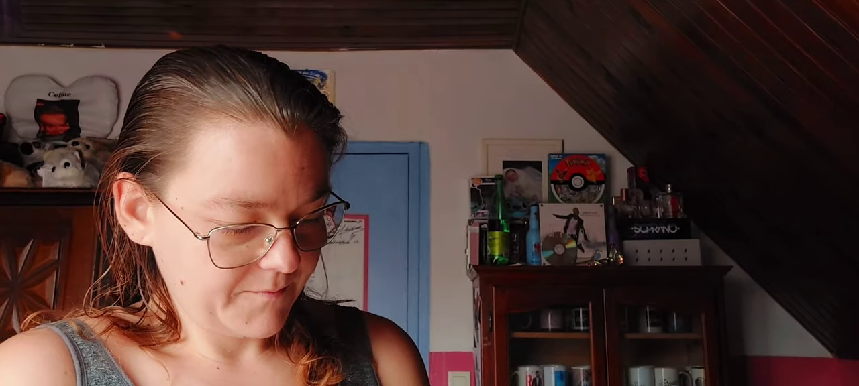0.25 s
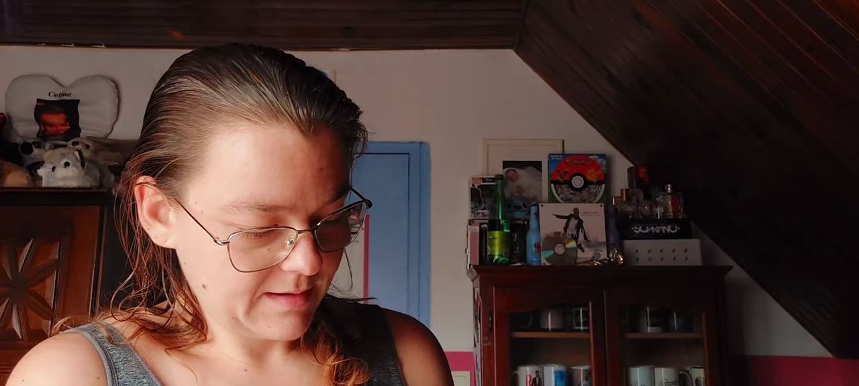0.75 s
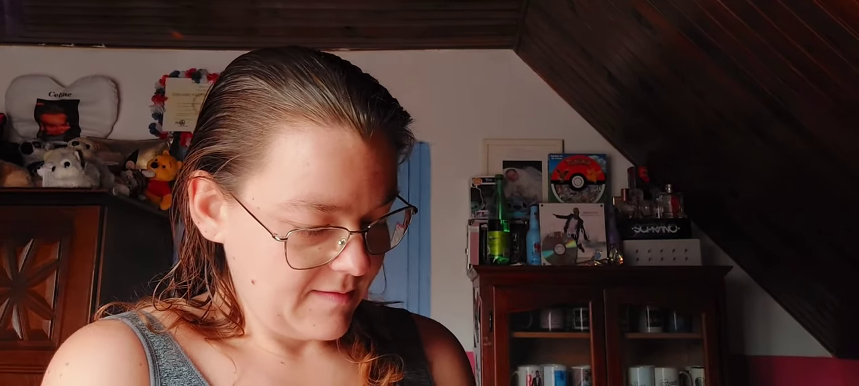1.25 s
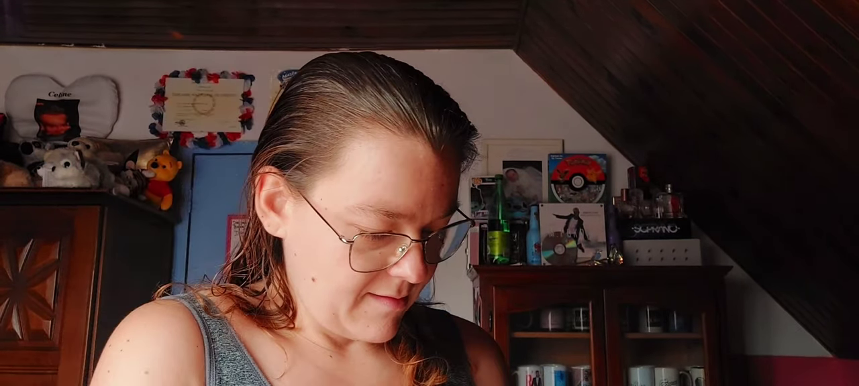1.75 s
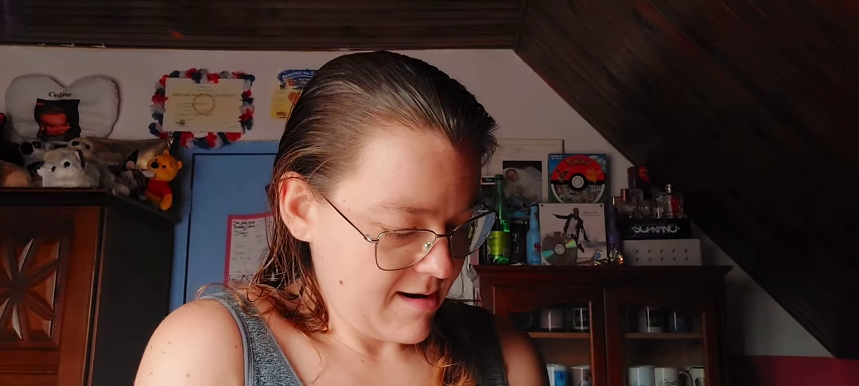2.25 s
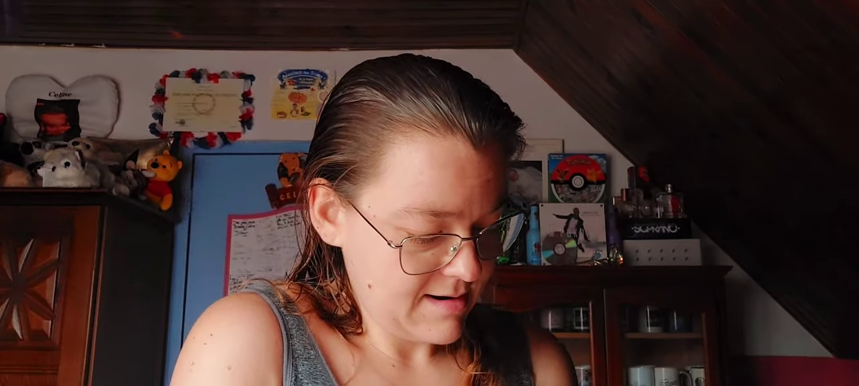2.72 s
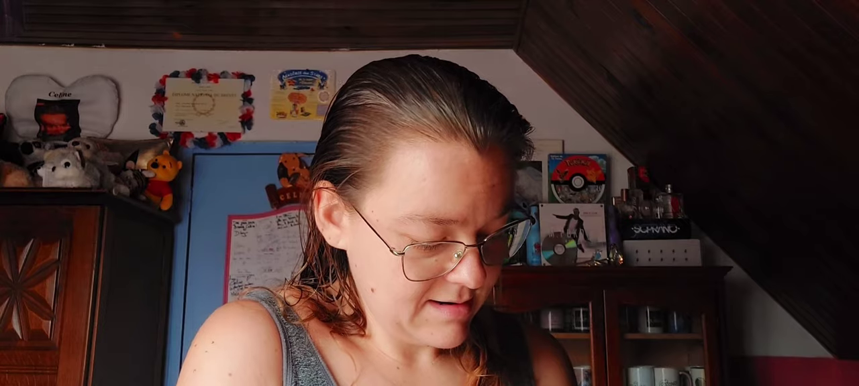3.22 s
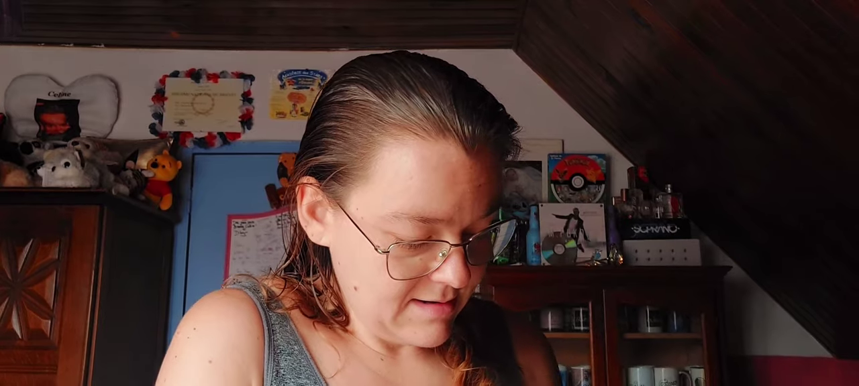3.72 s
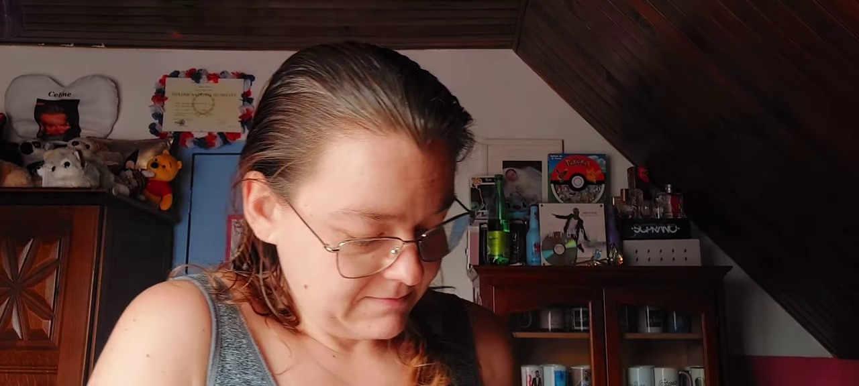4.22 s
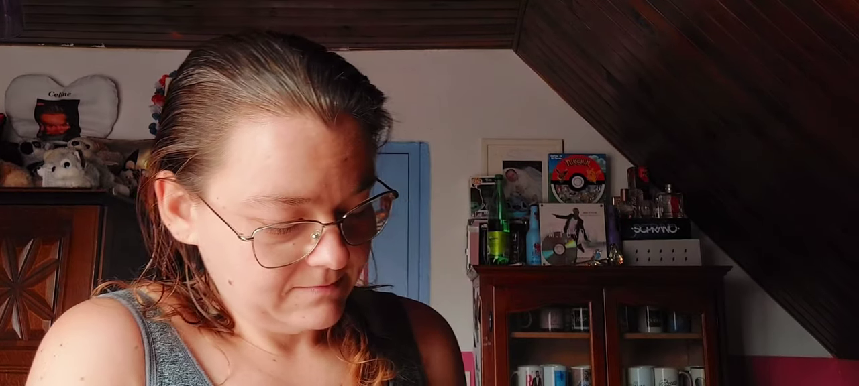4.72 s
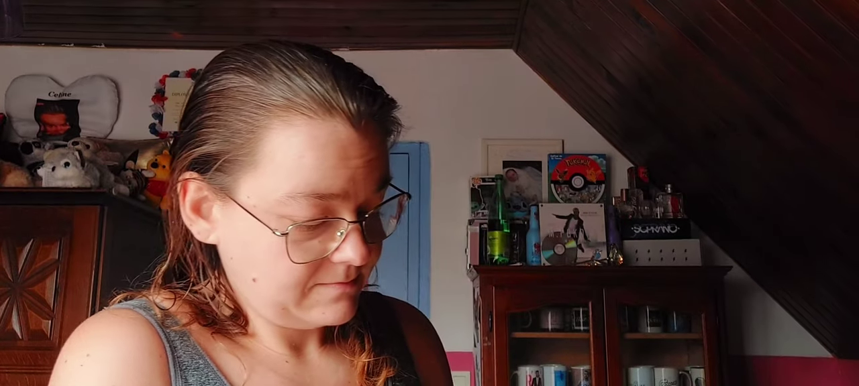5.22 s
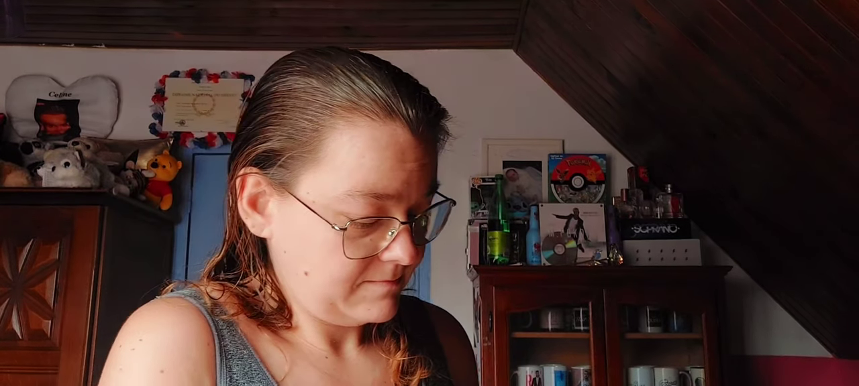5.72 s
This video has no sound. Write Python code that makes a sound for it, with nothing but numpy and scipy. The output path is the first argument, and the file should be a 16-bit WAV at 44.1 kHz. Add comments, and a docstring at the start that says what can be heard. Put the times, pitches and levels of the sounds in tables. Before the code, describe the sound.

A packet of stiff paper and thin plastic is unwrapped by hand close to the microphone, slightly to the left. It starts with faint rustling, then a cluster of sharp crinkles arrives at about 0.5 seconds, with a brief judder of a paper flap near 0.7. Scattered snaps and bright plastic clicks continue over uneven rustling. Around 2.1 seconds a finger rubs softly across the paper. From 2.5 to 3.9 seconds stiff folds pop and crackle, with soft thumps as the packet meets the fingers. The loudest sound, a sharp crackling pop with a dull thump, comes at 4.1 seconds. Lighter crinkling follows until about 5.3 seconds, when the hands settle and only a few faint plastic ticks remain until the end near 6. The room is small, with a short echo and a faint low hum.

```python
"""Hands unwrap a packet of stiff paper and thin plastic close to a microphone in a small, humming room.
From the start the sheets rustle by friction and creases buckle in sharp snaps. By half a second the taut
film clicks, stiff panels pop and the packet thumps against the fingers. Near 0.7 s a flap judders by
stick and slip; near 2.1 s a finger drags over the paper. The loudest pop comes at 4.1 s, and after 5.3 s
the hands come to rest, leaving a few clicks of film. The room adds a short reverberant tail."""
import sys
import numpy as np
from scipy import signal
from scipy.fft import rfft, irfft, next_fast_len
from scipy.io import wavfile
from scipy.ndimage import uniform_filter1d, map_coordinates

SR = 44100
rng = np.random.default_rng(int(sys.argv[2]) if len(sys.argv) > 2 else 0)


def int16_out(signal):
    """Quantize to a 16-bit WAV file."""
    q = np.round(np.clip(np.atleast_2d(signal).T, -1, 1) * 32767)
    wavfile.write(sys.argv[1], SR, q.astype(np.int16))


N = 263277

# Spectra. Each row: frequency in Hz, relative spectral density in dB.
AIR_SPECTRUM = [(15, -22.5), (35, 5), (60, -3), (110, 9.5), (200, -12), (450, -18), (1200, -15),
                (2300, -39.5), (3500, -42), (8000, -16.5), (16000, -40.5)]
SLIDING_SPECTRUM = [(200, -15), (420, -13), (680, -0.5), (1200, -8.5), (1600, -2.5), (1900, -6.5),
                    (2350, -3), (3000, -12.5), (4200, -10.5), (8000, -19)]
FILM_SPECTRUM = [(1000, -24.5), (2500, 4), (3600, -1.5), (4700, -2), (6000, -1.5), (7400, 1.5), (9000, -5),
                 (12500, 1), (16000, -6.5)]
GRIP_SPECTRUM = [(15, -73), (35, -40.5), (60, -1), (98, -10.5), (128, -3.5), (165, -8.5), (230, -4),
                 (400, -10), (650, -32), (1500, -42.5)]
BUCKLING_SPECTRUM = [(150, -44), (420, -18.5), (620, 1), (800, -2.5), (1100, -2.5), (1500, -5.5),
                     (1850, -6), (2350, -4), (3000, -8.5), (4200, -15.5), (8000, -37)]
# Likeness of left and right. Each row: frequency in Hz, coherence from 0 to 1.
COHERENCE = [(100, 0.54), (500, 0.35), (1500, 0.29), (3000, 0.092), (7000, 0.042), (15000, 0.05)]
# Reverberation. Each row: frequency in Hz, t60 (the time to fall 60 dB) in seconds.
ROOM_DECAY = [(120, 0.37), (600, 0.28), (2000, 0.2), (6000, 0.22), (15000, 0.14)]
# Sheets stirring between moves. Each row: time in seconds, paper level in dB, film level in dB.
STIRRING = [(0, -77.5, -71), (.3, -67.5, -65), (.95, -78, -64), (1.75, -62, -73.5), (2.3, -62.5, -72.5),
            (3.2, -64.5, -65), (4.6, -67.5, -61), (5.42, -69, -70), (5.95, -75, -71)]
# Sheet sliding over sheet. Each row: start and length in seconds, paper level in dB, film level in dB.
HAND_MOVES = [(0.0, 0.09, -64, -60), (0.398, 0.2, -59, -54), (0.479, 0.17, -44.5, -57),
              (0.668, 0.1, -40, -63), (0.85, 0.15, -55.5, -85), (1.043, 0.0155, -41.5, -59),
              (1.145, 0.52, -57, -62), (1.317, 0.026, -42.5, -54.5), (1.418, 0.3, -55, -84.5),
              (1.817, 0.11, -58.5, -50.5), (2.022, 0.087, -52.5, -56), (2.137, 0.14, -56, -63.5),
              (2.371, 0.29, -57, -56), (2.468, 0.11, -51, -51), (2.744, 0.1, -48.5, -53),
              (2.864, 0.07, -45.5, -51), (3.058, 0.066, -45.5, -75), (3.258, 0.35, -61, -63.5),
              (3.495, 0.067, -41.5, -67), (3.62, 0.27, -54.5, -54.5), (4.101, 0.028, -26.5, -36.5),
              (4.212, 0.33, -49.5, -54), (4.555, 0.12, -55, -84), (4.71, 0.2, -49.5, -56),
              (4.935, 0.089, -54.5, -60), (5.177, 0.1, -47.5, -47.5), (5.27, 0.074, -50.5, -59)]
# Hollow midrange peaks that colour the rustle and snaps. Each row: centre and width in Hz, gain in dB.
HOLLOW_RESONANCES = [(1121, 120, 6), (1310, 38, 4.5), (1360, 104.6, 7), (1605, 28, 5.5), (2250, 360, 5.5)]
# The changing grip. Each row: time in seconds, finger noise in dB relative to the paper's sliding gain.
GRIP_LEVELS = [(0.5, -14.5), (2.1, -19), (3.5, -12.5), (4.4, -10.5), (5.3, -15)]
# Buckling creases. Each row: time in seconds, level in dB, ring in Hz, offset of the film's crack in dB.
CREASE_SNAPS = [(0.102, -41.5, 1140, -2.5), (0.306, -38.5, 1000, -5.5), (0.486, -22.5, 930, 2),
                (0.492, -16, 1650, -6), (0.531, -23, 930, -3), (0.575, -23.5, 1990, -1),
                (0.581, -17, 1970, -10.5), (0.625, -23, 2260, -3), (0.721, -18.5, 1940, -5.5),
                (0.761, -16, 1950, -7), (1.0464, -22, 1500, -3), (1.075, -34.5, 1280, -16.5),
                (1.206, -36.5, 1790, -8.5), (1.314, -22, 1750, -4.5), (1.328, -27, 1400, -7.5),
                (1.365, -27.5, 2350, -3), (1.529, -31, 2240, -11), (1.594, -30, 1900, -7),
                (1.655, -32, 1700, -34), (1.8, -24.5, 2070, -6), (2.062, -20.5, 1850, -6.5),
                (2.225, -19, 2330, -11), (2.479, -20.5, 1400, -11.5), (2.537, -24, 1690, -8.5),
                (2.586, -22, 2170, -6.5), (2.638, -28.5, 1770, -24.5), (2.785, -14, 1610, -4),
                (2.915, -21.5, 790, -8.5), (2.944, -27, 1210, -24), (3.113, -23.5, 2230, -15.5),
                (3.475, -26, 1280, -13.5), (3.496, -30, 1230, -7), (3.519, -11.5, 1400, -10),
                (3.716, -30.5, 1500, -3), (3.832, -31, 1410, -2.5), (3.841, -26.5, 1390, -6.5),
                (4.007, -35, 1550, -6.5), (4.0995, -9.5, 2370, 1.5), (4.128, -11.5, 1300, -13.5),
                (4.134, -9, 1400, -7), (4.232, -28, 2340, 0), (4.3574, -20, 1300, -11),
                (4.396, -26, 1740, -7), (4.409, -26.5, 1250, -15), (4.441, -27.5, 2170, -13),
                (4.758, -29, 1650, -6), (4.83, -26.5, 2130, -6), (4.886, -19.5, 1050, -12),
                (5.072, -32.5, 2340, 0.5), (5.187, -23.5, 1330, -4), (5.228, -24, 704, -7),
                (5.287, -34, 1490, -7.5)]
# Clicks of the taut film. Each row: time in seconds, relative level in dB, ring in Hz.
FILM_CLICKS = [(0.379, -39.5, 11500), (1.048, -33, 12100), (1.3153, -12.5, 5100), (1.9116, -32, 7700),
               (1.9454, -28.5, 12870), (2.027, -17.5, 8000), (2.535, -25.5, 8000), (2.6982, -39.5, 12100),
               (2.8675, -32.5, 7960), (3.4023, -29, 7000), (3.4972, -26.5, 7450), (3.5173, -18.5, 7500),
               (3.736, -33.5, 7200), (3.9763, -36, 12300), (4.756, -32.5, 12480), (5.245, -23, 12170),
               (5.467, -30.5, 12060), (5.571, -35.5, 7240), (5.7383, -30, 10670)]
# Panels flipping through. Each row: time in seconds, level in dB, first mode in Hz, its t60 in seconds,
# offset of the overtone in dB, offset of the film's crack in dB.
PANEL_POPS = [(0.453, -28, 980, 0.013, -23, -26), (0.895, -22, 940, 0.0077, -6, -37),
              (2.027, -19.5, 1530, 0.017, -4, -2), (2.488, -11.5, 1354, 0.0096, -0.5, -16.5),
              (2.77, -14, 1600, 0.013, -9, -16), (2.879, -26, 1160, 0.017, -22, -5),
              (2.894, -27, 1010, 0.016, -3, -22), (2.902, -14.5, 1047, 0.016, -0.5, -27),
              (3.067, -14.5, 1390, 0.0073, -6, -19.5), (3.636, -12, 1426, 0.013, -10, -13.5),
              (3.861, -19, 1354, 0.014, -12, -6.5), (4.1245, 3, 1266, 0.0055, -5, -19),
              (4.8863, -19.5, 1234, 0.0073, 9.5, -9.5)]
# The packet meeting the fingers. Each row: time in seconds, level in dB.
JOLTS = [(0.497, -50), (1.058, -45.5), (1.319, -39), (1.803, -49.5), (2.488, -41.5), (2.773, -41),
         (2.9, -35.5), (3.067, -38.5), (3.524, -43), (3.635, -35), (3.859, -48.5), (4.099, -27),
         (4.123, -20), (4.359, -35), (5.235, -41), (5.3, -39.5)]
# Modes of the packet and of the flap. Each row: frequency in Hz, relative level in dB, t60 in seconds.
PACKET_MODES = [(62.3, -25, 0.099), (98, -7.5, 0.073), (123.6, -3, 0.13), (208.4, -10.5, 0.014),
                (243.7, 2, 0.043), (318.3, -1.5, 0.056)]
FLAP_MODES = [(560, -21, .013), (730, -12, 0.02), (1040, -4, 0.025), (1240, -11, 0.017),
              (2040, -6.5, 0.011), (3050, -20, 0.008)]
# Runs of stick and slip. Each row: start and length in seconds, slips per second, force in dB.
SLIP_RUNS = [(.6889, .0135, 265, -15.5), (.7082, .025, 220, -16.5), (.7365, .012, 250, -27)]
# A dragging finger. Each row: start and length in seconds, level in dB, resonance and its width in Hz.
FINGER_DRAGS = [(2.076, 0.23, -61.5, 683, 163)]
# Colour of the two microphone ports. Each row: frequency in Hz, left minus right in dB.
PORT_BALANCE = [(60, 6), (120, 10.5), (240, -1), (480, 9), (950, 2.5), (1890, -0.5), (3770, 2), (7520, -2),
                (15000, 1)]

LEFT_LEAD_S = 0.000093  # the left port hears the packet first
STRAIN_S = .008  # a crease creaks this long before it buckles
DRIFT_OCTAVES = .13  # greatest shift in pitch of the hollow peaks
# Rise and decay of a buckled patch, in seconds.
PAPER_FALL = dict(attack=.0004, t60=.016, settle_t60=.07)
FILM_FALL = dict(attack=.0003, t60=.0105, settle_t60=.045)
CLICK_FALL = dict(attack=.0002, t60=.0075, settle_t60=.04)


def amp(db):
    """Amplitude grows tenfold for every 20 dB."""
    return 10 ** (np.asarray(db) / 20)


def unit(x):
    """Normalisation to an rms of 1."""
    return x / np.sqrt(np.mean(x ** 2) + 1e-20)


def along(points, hz):
    """Interpolation of (Hz, value) points on a logarithmic frequency axis."""
    f, v = np.transpose(points)
    return np.interp(np.log(hz + 1), np.log(f + 1), v)


def peak(hz, centre_hz, octaves):
    """A resonance as a bell curve of height 1 in log frequency."""
    return np.exp(-(np.log2((hz + 1) / centre_hz) / octaves) ** 2)


def wobble(rate):
    """Smooth random modulation through `rate` knots a second."""
    return map_coordinates(rng.standard_normal(int(N * rate / SR) + 4), [np.arange(N) * rate / SR])


def colour(x, db_of):
    """A minimum-phase, hence causal, filter with a gain of db_of(hz) decibels."""
    n = x.shape[-1]
    m = 2 * next_fast_len(n // 2 + 2048)
    cepstrum = irfft(np.log(amp(db_of(np.fft.rfftfreq(m, 1 / SR)))), m)
    cepstrum[1:m // 2] *= 2
    cepstrum[m // 2 + 1:] = 0
    return irfft(rfft(x, m) * np.exp(rfft(cepstrum)), m)[..., :n]


def spread(pair):
    """A wide source is partly coherent at two ports: more in the bass, less in the treble."""
    n = pair.shape[-1]
    m = next_fast_len(n + 256)
    hz = np.fft.rfftfreq(m, 1 / SR)
    turn = np.arccos(np.clip(along(COHERENCE, hz), 0, 1)) / 2
    mid, side = rfft(pair, m) * [np.cos(turn), np.sin(turn)]
    delay = np.exp(-2j * np.pi * hz * LEFT_LEAD_S)
    return irfft(np.array([mid + side, (mid - side) * delay]), m)[:, :n]


def rush(spectrum, envelope):
    """Source and filter: modulated noise takes on a spectrum; stereo, rms 1."""
    return unit(spread(colour(envelope * rng.standard_normal((2, N)), lambda hz: along(spectrum, hz))))


def room(x):
    """Reverberation: a diffuse tail in which each frequency decays exponentially at its own rate."""
    hz, t, noise = signal.stft(rng.standard_normal((2, SR // 3)), SR, nperseg=256)
    tail = signal.istft(noise * amp(-60 * t / along(ROOM_DECAY, hz)[:, None]), SR, nperseg=256)[1]
    onset = 1 - np.exp(-(np.arange(tail.shape[1]) / SR / 0.0008) ** 2)
    tail = spread(tail * onset)
    return signal.fftconvolve(x[:1], tail / np.linalg.norm(tail[0]), axes=1)


def room_tone(air_db=-72, hum_hz=57, hum_db=-76):
    """The noise floor: still air and a low hum that wavers by phase modulation."""
    hum = np.sin(2 * np.pi * hum_hz * np.arange(N) / SR + 0.25 * wobble(4.4))
    return amp(air_db) * rush(AIR_SPECTRUM, 1) + amp(hum_db) * hum


def gesture(start, length, attack=0.0032, t60=0.13):
    """The envelope of a hand move rises linearly, holds, and decays exponentially."""
    t = np.arange(N) / SR - start
    return np.clip(t / attack, 0, 1) * amp(-60 * np.clip((t - length) / t60, 0, 2))


def sliding_gains():
    """Incoherent sources add in power: stirring and moves set the gains of paper and film."""
    times, *levels = np.transpose(STIRRING)
    power = amp([np.interp(np.arange(N) / SR, times, level) for level in levels]) ** 2
    for start, length, paper_db, film_db in HAND_MOVES:
        power = power + (amp([[paper_db], [film_db]]) * gesture(start, length)) ** 2
    return np.sqrt(power)


def crinkle_envelope(rate, spread_db, t60):
    """Shot noise: the decaying powers of tiny random creases, most weak and a few strong, add up."""
    when, strength = rng.random((int(rate * N / SR), 2)).T
    sizes = amp(spread_db * np.minimum(-np.log(1 - strength), 3))
    impulses = np.bincount((when * N).astype(int), sizes ** 2, N)
    power = signal.lfilter([1], [1, -amp(-120 / (t60 * SR))], impulses)
    return unit(np.sqrt(np.abs(uniform_filter1d(power, size=40))))


def tiny_creases(spectrum, rate, low_hz, high_hz, octaves, spread_db, t60=.011, size=640):
    """Tiny creases buckle at random, each a damped noise grain in its own band; stereo, rms 1."""
    count = int(rate * N / SR)
    when, strength, pitch = rng.random((count, 3)).T[..., None]
    t = np.arange(size) / SR - STRAIN_S / 2
    grains = rng.standard_normal((2, count, size)) * (t > 0) * amp(-60 * np.abs(t) / t60)
    band = peak(np.fft.rfftfreq(size, 1 / SR), low_hz * (high_hz / low_hz) ** pitch, octaves)
    grains = irfft(rfft(grains) * amp(20 * band))
    grains *= amp(spread_db * np.minimum(-np.log(1 - strength), 3)) / grains.std(axis=(0, 2))[:, None]
    index = (when * N).astype(int) + np.arange(size)
    pair = np.array([np.bincount(index.ravel(), side.ravel(), N)[:N] for side in grains])
    return unit(spread(colour(pair, lambda hz: along(spectrum, hz))))


def hollow(hz):
    """Lorentzian peaks in the midrange give a hollow colour; gain in dB."""
    return sum(db / (1 + (2 * (hz - centre) / width) ** 2) for centre, width, db in HOLLOW_RESONANCES)


def drifting_hollow(x):
    """A time-varying filter: the hollow peaks shift slightly in pitch, fading among three tunings."""
    drift = np.clip(wobble(8), -1, 1)
    return sum(np.maximum(1 - np.abs(drift - k), 0)
               * colour(x, lambda hz: hollow(hz * 2 ** (k * DRIFT_OCTAVES))) for k in (-1, 0, 1))


def rustle(paper_db=-0.5, film_db=1.0, paper_rub=0.7, film_rub=0.6, resting_db=-84, wet_db=-8):
    """Friction: sliding sheets hiss unevenly and crinkle, while shifting fingers rumble on the packet."""
    paper_gain, film_gain = sliding_gains()
    catches = crinkle_envelope(rate=150, spread_db=5.5, t60=.022)
    paper = .65 * tiny_creases(SLIDING_SPECTRUM, rate=170, low_hz=900, high_hz=2600,
                               octaves=1.3, spread_db=4)
    paper += rush(SLIDING_SPECTRUM, paper_rub + catches)
    paper = amp(paper_db) * paper_gain * unit(drifting_hollow(paper))
    film = .85 * tiny_creases(FILM_SPECTRUM, rate=120, low_hz=4200, high_hz=15000,
                              octaves=.55, spread_db=5.5)
    film += rush(FILM_SPECTRUM, (film_rub + catches) * amp(1.5 * wobble(35)))
    film = amp(film_db) * film_gain * unit(film)
    grip = amp(np.interp(np.arange(N) / SR, *np.transpose(GRIP_LEVELS)))
    fingers = (grip * paper_gain + amp(resting_db)) * rush(GRIP_SPECTRUM, amp(1.4 * wobble(63)))
    sheets = paper + film + fingers
    return sheets + amp(wet_db) * room(sheets)[:, :N]


def relaxing_film(level_db=-72, wet_db=-7):
    """Stress relaxation: crumpled film keeps giving faint ticks, even between moves."""
    ticks = amp(level_db) * tiny_creases(FILM_SPECTRUM, rate=12, low_hz=5000, high_hz=14000,
                                         octaves=.9, spread_db=5)
    return ticks + amp(wet_db) * room(ticks)[:, :N]


def add(track, s, x):
    """Superposition of x on the track from s seconds on."""
    start = max(round(s * SR), 0)
    part = track[:, start:start + x.shape[1]]
    part += x[:, :part.shape[1]]


def radiation(hz, ring_hz, corner=0.69):
    """Radiation efficiency in dB: a small patch emits little far below its own ring."""
    return -10 * np.log10(1 + (corner * ring_hz / (hz + 150)) ** 6)


def buckle(db_of, attack, t60, settle_t60, settle_db, ragged_db, strain_db=-21):
    """Buckling: a patch strains, lets go in ragged steps and settles; energy as of 1 ms at rms 1."""
    t = np.arange(SR // 8) / SR - STRAIN_S
    after = np.maximum(t, 0)
    decay = amp(-60 * after / t60) + amp(settle_db - 60 * after / settle_t60)
    release = decay * (1 - np.exp(-after / attack))
    strain = amp(strain_db) * (t < 0) * (1 + t / STRAIN_S) ** 3
    steps = np.interp(t, np.linspace(t[0], t[-1], 150), rng.standard_normal(150))
    noise = rng.choice([-1, 1], (2, len(t))) * (strain + release) * amp(ragged_db * steps)
    burst = spread(colour(noise, db_of))
    return burst / np.sqrt(np.sum(burst ** 2) / 2 / (SR / 1000))


def crease_snaps(large_hz=4800, small_hz=12000, paper_db=-3.5, crack_db=-3):
    """Impulsive excitation: a buckling crease rings its paper and cracks the film, lower if large."""
    out = np.zeros((2, N))
    for s, db, ring_hz, crack_offset in CREASE_SNAPS:
        film_hz = np.interp(db, [-45, -20], [small_hz, large_hz]) * 2 ** (.15 * rng.normal())
        shift = 2 ** (DRIFT_OCTAVES * rng.uniform(-1, 1))
        paper_shape = lambda hz: (along(BUCKLING_SPECTRUM, hz) + hollow(hz * shift)
                                  + 5.5 * peak(hz, ring_hz, octaves=0.38) + radiation(hz, ring_hz))
        film_shape = lambda hz: along(FILM_SPECTRUM, hz) + 4 * peak(hz, film_hz, octaves=0.6)
        paper = amp(db + paper_db) * buckle(paper_shape, **PAPER_FALL, settle_db=-13, ragged_db=5.5)
        film = buckle(film_shape, **FILM_FALL, settle_db=-7.5, ragged_db=1)
        film *= amp(db + crack_offset + crack_db)
        add(out, s - STRAIN_S, paper + film)
        add(out, s - STRAIN_S, room(amp(-10) * paper + amp(-6) * film))
    return out


def film_clicks(level_db=-8, ring_db=8, wet_db=-9):
    """Snap-through of a membrane: the taut film flicks over in one short, bright click."""
    out = np.zeros((2, N))
    for s, db, ring_hz in FILM_CLICKS:
        shape = lambda hz: (along(FILM_SPECTRUM, hz) + ring_db * peak(hz, ring_hz, octaves=0.34)
                            + radiation(hz, ring_hz, corner=.35))
        click = buckle(shape, **CLICK_FALL, settle_db=-21, ragged_db=3, strain_db=-27)
        click *= amp(db + level_db)
        add(out, s - STRAIN_S, click)
        add(out, s - STRAIN_S, room(amp(wet_db) * click))
    return out


def panel_pops(mode_ratio=1.75, overtone_t60=0.0077, attack=0.00081, paper_db=-12.5, crack_db=-3,
               wet_db=-10):
    """Snap-through of a plate: two damped modes ring, with a little paper noise and a crack of film."""
    out = np.zeros((2, N))
    t = np.maximum(np.arange(SR // 8) / SR - STRAIN_S - [[0], [LEFT_LEAD_S]], 0)
    for s, db, hz, t60, overtone_db, crack_offset in PANEL_POPS:
        ring = amp(-60 * t / t60) * np.sin(2 * np.pi * hz * t)
        ring += amp(overtone_db - 60 * t / overtone_t60) * np.sin(2 * np.pi * mode_ratio * hz * t)
        ring *= 1 - np.exp(-t / attack)
        paper_shape = lambda f: along(BUCKLING_SPECTRUM, f) + hollow(f) + radiation(f, hz)
        paper = buckle(paper_shape, **PAPER_FALL, settle_db=-13, ragged_db=5)
        film = buckle(lambda f: along(FILM_SPECTRUM, f), **FILM_FALL, settle_db=-15, ragged_db=2)
        pop = amp(db) * (ring + amp(paper_db) * paper + amp(crack_offset + crack_db) * film)
        add(out, s - STRAIN_S, pop)
        add(out, s - STRAIN_S, amp(wet_db) * room(pop))
    return out


def packet_thumps(attack=0.0084, wet_db=-11):
    """Free vibration: each soft jolt against the fingers rings the packet's low modes."""
    out, t = np.zeros((2, N)), np.arange(SR // 8) / SR
    for s, jolt_db in JOLTS:
        tunings = 1 + .03 * rng.standard_normal(len(PACKET_MODES))
        scatter_db = rng.normal(0, 1.5, len(PACKET_MODES))
        ring = sum(amp(db + scatter - 60 * t / t60) * np.sin(2 * np.pi * hz * tuning * t)
                   for (hz, db, t60), tuning, scatter in zip(PACKET_MODES, tunings, scatter_db))
        thump = amp(jolt_db) * np.tile(ring * (1 - np.exp(-t / attack)), (2, 1))
        add(out, s, thump)
        add(out, s, amp(wet_db) * room(thump))
    return out


def flap_judder(jitter=.05, attack=0.00034, rasp_db=-15, rasp_t60=.016, rasp_hz=3000, wet_db=-13):
    """Stick-slip friction: every slip rasps and rings the flap's modes, bent a little differently."""
    out, t = np.zeros((2, N)), np.arange(SR // 20) / SR
    arrival = t - [[0], [LEFT_LEAD_S]]
    onset = 1 - np.exp(-(t / attack) ** 2)
    lowpass = lambda hz: -10 * np.log10(1 + (hz / rasp_hz) ** 4)
    for start, length, rate, force_db in SLIP_RUNS:
        for s in np.arange(start, start + length, 1 / rate):
            bend = 1 + .035 * rng.normal()
            ring = sum(amp(db + rng.normal(0, 2.8, (2, 1)) - 60 * t / t60)
                       * np.sin(2 * np.pi * hz * bend * arrival) for hz, db, t60 in FLAP_MODES)
            noise = unit(colour(rng.standard_normal((2, len(t))), lowpass))
            rasp = amp(rasp_db - 60 * t / rasp_t60) * noise
            add(out, s + jitter * rng.normal() / rate, amp(force_db) * (ring + rasp) * onset)
    strongest_hz = FLAP_MODES[2][0]
    out = colour(out, lambda hz: radiation(hz, strongest_hz))
    return out + amp(wet_db) * room(out)[:, :N]


def finger_drag(rough_db=2):
    """Friction noise through one resonance: a finger draws a soft, hollow rub from the paper."""
    out = np.zeros((2, N))
    for start, length, db, centre, width in FINGER_DRAGS:
        band = lambda hz: 10 * np.log10(1e-5 + 1 / (1 + (2 * (hz - centre) / width) ** 4))
        envelope = amp(db + rough_db * wobble(66)) * gesture(start, length)
        out += envelope * unit(spread(colour(rng.standard_normal((2, N)), band)))
    return out


def ports(pair):
    """Frequency response: each microphone port favours its own bands."""
    return np.array([colour(x, lambda hz: side * along(PORT_BALANCE, hz) / 2)
                     for x, side in zip(pair, (1, -1))])


def scene():
    """The sources superpose, a little to the left; pops and thumps bypass the ports' colouring."""
    sheets = crease_snaps() + film_clicks() + flap_judder() + rustle() + relaxing_film() + finger_drag()
    return ports(sheets + room_tone()) + panel_pops() + packet_thumps()


def record(dry, low_cut_hz=36, top_hz=16100):
    """Band limiting: the microphone rolls off the deep bass and passes nothing above top_hz."""
    m = next_fast_len(N + SR // 2)
    hz = np.fft.rfftfreq(m, 1 / SR)
    highpass = 1j * hz / (low_cut_hz + 1j * hz)
    return irfft(rfft(dry, m) * highpass * (hz < top_hz), m)[:, :N]


dry = scene()
out = record(dry)
int16_out(out)
```